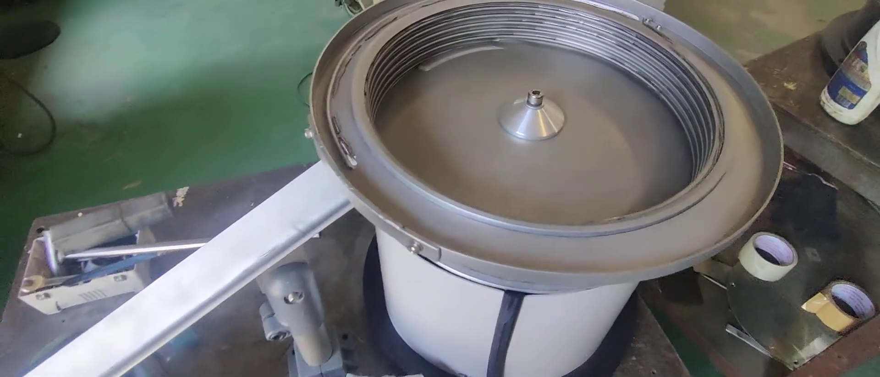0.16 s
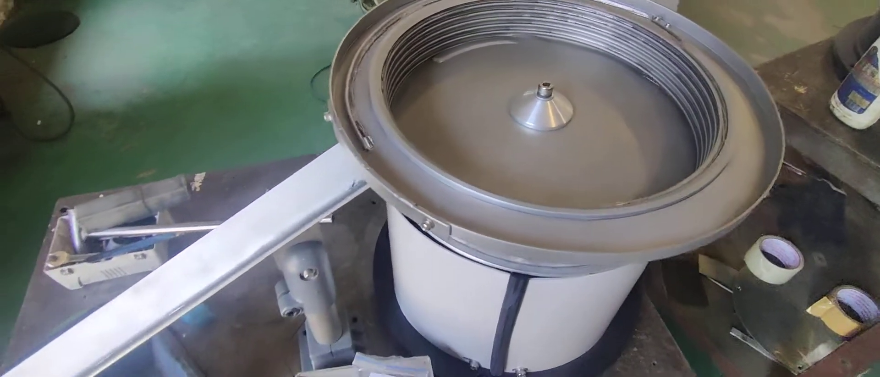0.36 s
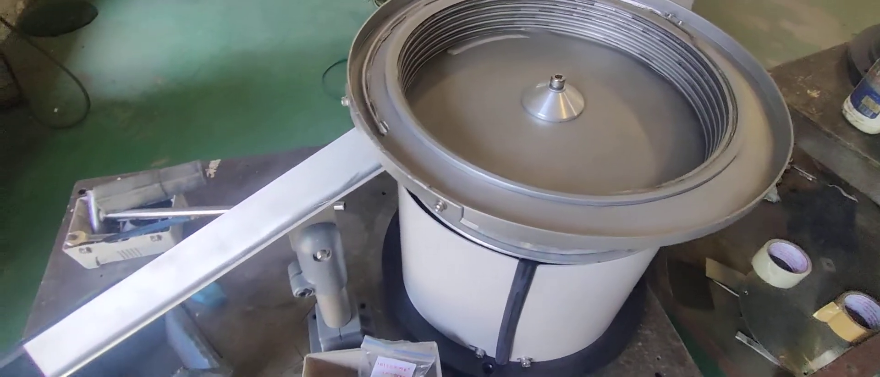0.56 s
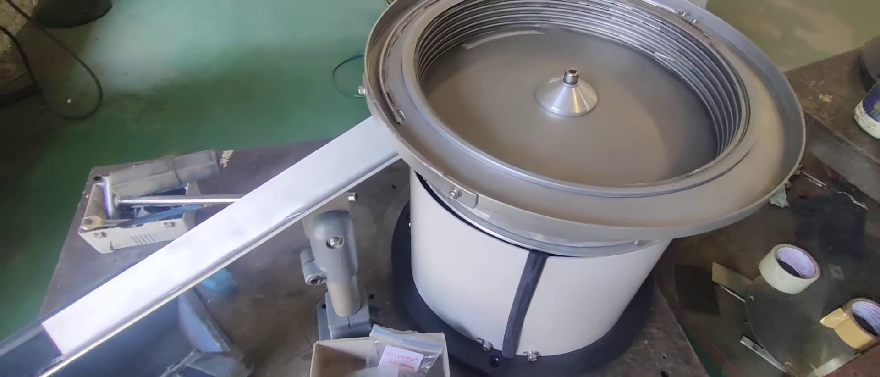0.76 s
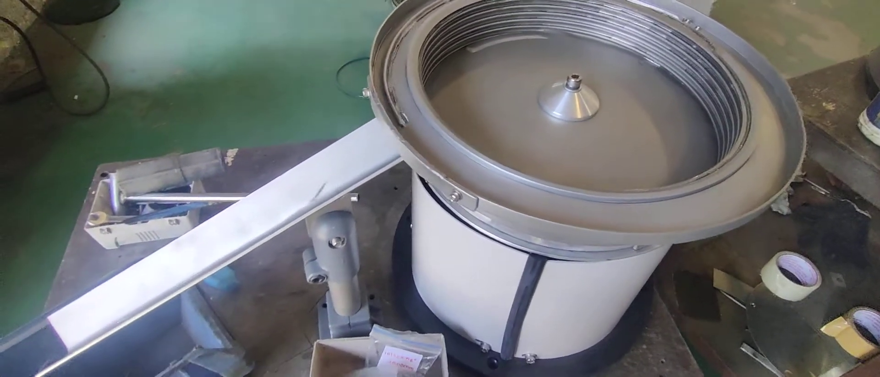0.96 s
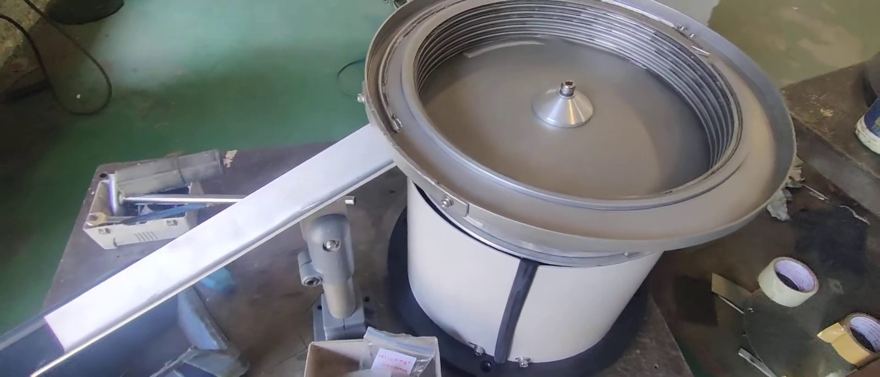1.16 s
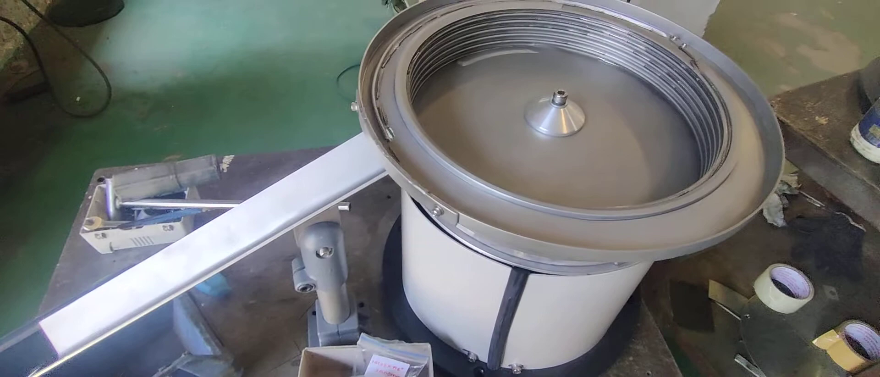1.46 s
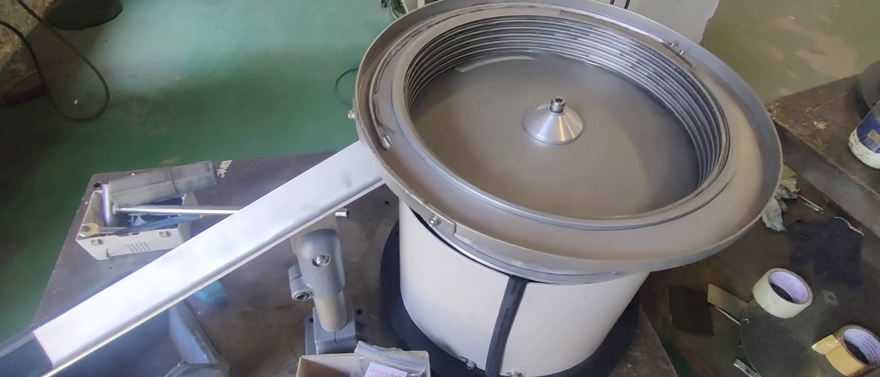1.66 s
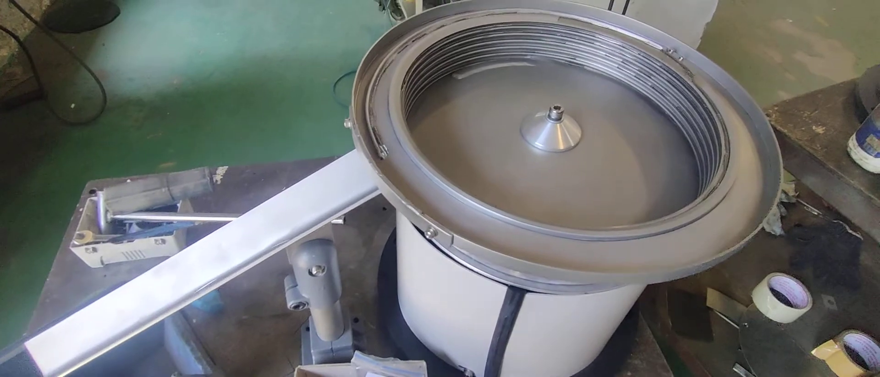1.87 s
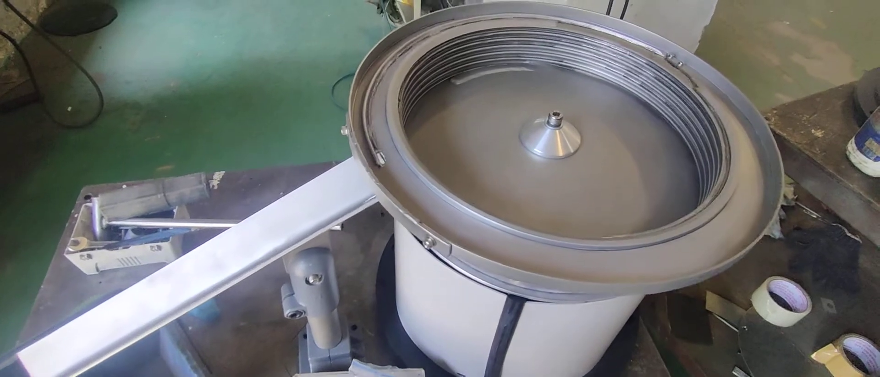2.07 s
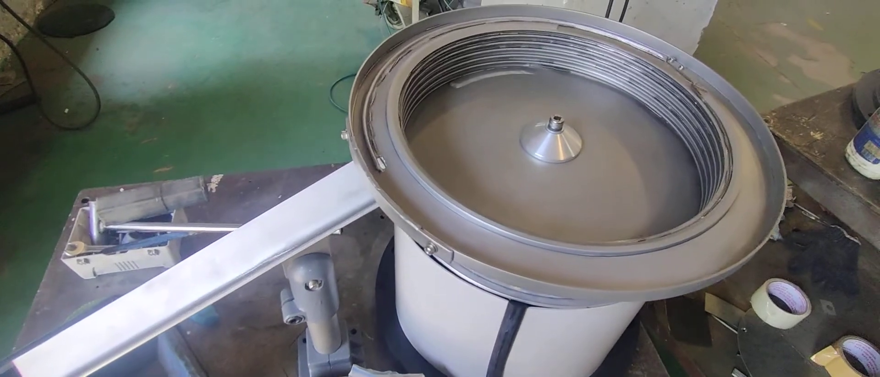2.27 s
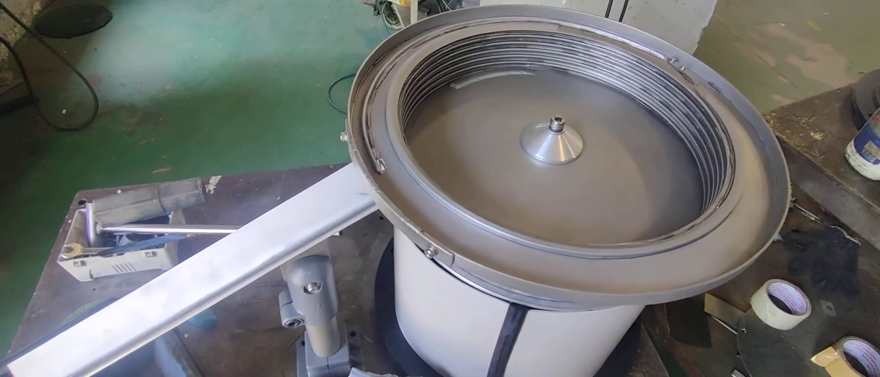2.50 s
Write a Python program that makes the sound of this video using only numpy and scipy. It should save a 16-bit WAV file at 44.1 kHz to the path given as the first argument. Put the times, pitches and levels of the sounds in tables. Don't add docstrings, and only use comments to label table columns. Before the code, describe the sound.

A vibrating steel bowl feeder hums steadily around 100 Hz throughout, with fine high chatter and short ringing rim pings stronger at right. Sharp, dry clacks of parts on the chute start at 0.13 s, recur near 0.24, 0.5, 0.73 and 1.0, crowd at 1.1-1.25, then thin out; hard ones hit at 2.19 and 2.32. Workshop rumble continues to 2.6 s, close, slightly compressed pickup.

```python
import sys
import numpy as np
from scipy import signal
from scipy.fft import rfft, irfft
from scipy.io import wavfile
from scipy.ndimage import uniform_filter1d

SR = 44100
rng = np.random.default_rng(int(sys.argv[2]) if len(sys.argv) > 2 else 0)


def ratio(d):
    e = np.asarray(d, float) / 20
    return 10 ** e


def to_wav(s):
    ch = np.atleast_2d(s).T
    pcm = np.round(np.clip(ch, -1, 1) * 32767)
    wavfile.write(sys.argv[1], SR, pcm.astype(np.int16))


N = 116424
LEFT_THEN_RIGHT = np.array([[1], [-1]])


def curve(table, at, log=False):
    x, y = np.array(table, float).T
    return np.interp(np.log(at), np.log(x), y) if log else np.interp(at, x, y)


def level(x, db):
    return x * ratio(db) / np.sqrt(np.mean(x ** 2))


def band(x, hz, width):
    edges = np.clip([hz - width / 2, hz + width / 2], 5, .45 * SR)
    return signal.sosfilt(signal.butter(N=1, Wn=edges, btype="band", fs=SR, output="sos"), x)


def ring(x, hz, t60):
    pole = np.exp(2j * np.pi * hz / SR - np.log(1000) / (t60 * SR))
    return signal.lfilter([1], [1, -pole], x).imag


def walk(rate):
    k = int(SR / rate)
    held = np.repeat(rng.standard_normal(N // k + 1), k)
    return 0.92 * uniform_filter1d(uniform_filter1d(held, k), k)[:N]


def place(x, pan_db, left_shift):
    return np.array([np.roll(x, left_shift) * ratio(pan_db / 2), x * ratio(-pan_db / 2)])


def below_top(x):
    top_hz = 15760
    return irfft(rfft(x) * (np.fft.rfftfreq(x.shape[-1], 1 / SR) < top_hz), x.shape[-1])


# multiple of the drive, left level in dB, right level in dB.
HUM_LINES = [(1, -13.5, -13.5), (2, -34.5, -33), (3, -28, -32), (4, -58, -43), (5, -46.5, -39.5),
             (6, -41.5, -41.5), (7, -52, -41.5), (8, -39, -41.5), (9, -32, -33.5), (10, -62, -36.5),
             (11, -45, -40), (12, -45, -49.5), (14, -58, -42.5)]
# time in seconds, gain in dB.
NINTH_SWELL = [(0, -5), (.55, -2.5), (.7, 0), (1.6, 1), (1.85, 2.5), (2.15, -0.5), (2.64, 0.5)]
DRIVE_HZ = 100.047
LAG_RAD, WOBBLE_DB = .6, 0.84


def hum(t):
    out = 0
    for k, left_db, right_db in HUM_LINES:
        lag = LAG_RAD * (k - 1) ** 2
        jitter = .012 * (k - 1) * walk(4)
        line = np.cos(2 * np.pi * k * DRIVE_HZ * t - lag + jitter)
        line_db = np.array([[left_db], [right_db]]) + WOBBLE_DB * np.sqrt(k) * walk(16) / 2
        if k == 9:
            line_db = line_db + curve(NINTH_SWELL, t)
        out = out + line * ratio(line_db)
    return out


# start in seconds, level in dB, pitch in Hz,
# left minus right in dB, brightness in dB.
CLACKS = [(.1343, -17, 7000, -8, -4), (.1390, -7, 6200, -4, 6), (.1427, -19, 6900, 0, 0),
          (.1470, -22, 4500, 0, -3), (0.2426, -5, 7000, -2, -3), (.2456, -19, 6800, -2, -4),
          (.2543, -22, 5200, 0, -4), (.4947, -4.5, 6060, 0, 2), (0.505, -17, 7500, -10, -3),
          (0.67, -14, 6500, -4, -5), (.7313, -7, 7500, -6, 5), (0.7323, -16, 6500, 0, 7),
          (.9923, -15.5, 7500, -10, 6), (0.9933, -7, 8400, -3, 6), (.9987, -10.5, 5900, -11, -4),
          (1.0861, -8, 6200, -9, 0), (1.087, -20, 3300, 2, 0), (1.1032, -21, 6600, 0, -4),
          (1.1393, -5, 5440, -4, -10), (1.1406, -15, 2900, 4, 0), (1.1842, -10, 3500, 3, 8),
          (1.1864, -19, 4300, -6, -2), (1.189, -17, 3450, -1, 4), (1.2288, -11, 5800, -1, -2),
          (1.232, -8, 8300, -11, -2), (1.2352, -9, 8400, -2, 3), (1.2370, -19, 7000, -6, 0),
          (1.4594, -16, 6200, -5, -3), (1.4655, -17.5, 5300, -5, -3), (1.4697, -16, 5500, -4, -1),
          (1.4768, -16.5, 7000, -5, -3), (1.662, -13, 7200, -4, -3), (1.7580, -17, 4800, -9, -3),
          (2.1582, -18, 4400, 1, -3), (2.1926, -4.5, 7000, 0, 7), (2.229, -14, 6200, 2, -2),
          (2.251, -11, 3200, -6, -2), (2.3024, -20, 4350, -2, -3), (2.3223, -6, 7000, -5, -4),
          (2.3236, -13.5, 2600, 2, 0)]
# frequency in Hz, gain in dB.
LEFT_PORT = [(1000, -22), (2700, -9), (4200, -6), (5800, 3), (7200, -6.5), (9000, -8), (11500, -10),
             (16000, -11)]
# frequency in Hz, gain in dB.
RIGHT_PORT = [(1000, -29), (2700, -13), (4500, -1), (5800, -2), (7500, 1), (9300, -1), (10800, -16),
              (15000, -29)]
RATTLE_DB, RATTLE_T60_S = -15, .009
TAIL_DB, TAIL_T60_S = -31, .045
PITCH_DB, PITCH_WIDTH_HZ, BRIGHT_FROM_HZ = 7, 600, 10000
DULL_DB, DULL_UNDER_HZ = 16, 5200
SHARP_DB, SHARP_TOP_HZ = -9, 16700
CHUTE_LEFT_SHIFT = -15


def clack_tint_db(f, hz, bright_db):
    pitch_db = PITCH_DB * np.exp(-((f - hz) / PITCH_WIDTH_HZ) ** 2)
    octaves_low = max(np.log2(DULL_UNDER_HZ / hz), 0)
    dull_db = DULL_DB * octaves_low * np.log2(np.maximum(f / hz, 1))
    return pitch_db + bright_db * (f > BRIGHT_FROM_HZ) - dull_db - 60 * (f > SHARP_TOP_HZ)


def clacks():
    n, lead = SR // 8, 200
    out = np.zeros((2, N + SR))
    u = (np.arange(n) - lead) / SR
    f = np.fft.rfftfreq(n, 1 / SR) + 1
    click = u == 0
    rattle_fade = ratio(RATTLE_DB - 60 * abs(u) / RATTLE_T60_S) * (u > 0)
    tail_fade = ratio(TAIL_DB - 60 * abs(u) / TAIL_T60_S) * (u > 0)
    ports_db = np.array([curve(LEFT_PORT, f, True), curve(RIGHT_PORT, f, True)])
    for s, db, hz, pan_db, bright_db in CLACKS:
        noise = rng.standard_normal((4, n))
        rattle = (noise[0] + 0.89 * noise[1:3]) * rattle_fade
        blow = click + rattle + noise[2:] * tail_fade
        hit = irfft(rfft(blow) * ratio(ports_db + clack_tint_db(f, hz, bright_db)), n)
        hit = hit / np.sqrt((hit ** 2).sum(axis=1, keepdims=True))
        hit = hit * ratio(db + 10.5 + LEFT_THEN_RIGHT * pan_db / 2)
        hit = np.array([np.roll(hit[0], CHUTE_LEFT_SHIFT), hit[1]])
        i = int(s * SR) - lead
        out[:, i:i + n] += hit if db > SHARP_DB else below_top(hit)
    return out[:, :N]


CHATTER_PER_S, CHATTER_DB, CHATTER_HZ = 1700, -40, 8400


def track_ticks(t):
    chance = CHATTER_PER_S / SR * (1 - .5 * np.sin(2 * np.pi * DRIVE_HZ * t))
    return (rng.random(N) < chance) * ratio(2.14 * rng.exponential(size=N) + 0.89 * walk(9.44))


def chatter(ticks):
    both = ticks * rng.standard_normal((2, N))
    for _ in range(2):
        both = band(both, CHATTER_HZ, 2300)
    return level(both, CHATTER_DB) * ratio(-6 * LEFT_THEN_RIGHT)


# start in seconds, level in dB, mode nearest the blow in Hz,
# that mode's extra level in dB.
PINGS = [(0.036, -36, 9360, 25.5), (0.073, -22.5, 8184, 0.5), (0.188, -27, 7982, -12),
         (0.388, -24, 8184, 1.5), (.45, -33, 8763, 13), (0.523, -32.5, 8184, 4), (0.596, -38, 8763, 4),
         (0.642, -29.5, 8184, 5.5), (.835, -47, 9360, 30), (.882, -29, 9862, 4), (.91, -45, 9162, 7),
         (1.03, -48, 8184, 14), (1.066, -26.5, 9862, 6), (1.587, -24.5, 9862, 7), (1.701, -32.5, 8763, 10),
         (1.74, -27, 6904, 5), (2.046, -27.5, 8184, -4), (2.108, -26.5, 9862, 11.5),
         (2.174, -26.5, 7982, 1), (2.325, -29, 7982, -8), (2.576, -27.5, 8184, -1)]
RIM_HZ = [11800, 6336, 6904, 7424, 7982, 8184, 8763, 9162, 9360, 9862, 10470, 13730, 13320, 14970]
RIM_PAN_DB = [3, -14, -15, -15, -17, -17, -17, -16, -16, -14, -10, 2, 2, 2]
# level in dB, 60 dB decay in seconds, level of the chatter in it in dB.
RIM_RING = [(-14, 0.1, -30), (-20.5, 0.38, -10), (-23, 0.56, -2), (-15.5, 0.19, -11), (-16, 0.26, -11),
            (-13, 0.22, 2), (-23.5, 0.28, -1.5), (-24, 0.46, -4.5), (-29, 0.13, -3.5), (-23, 0.27, -7),
            (-22.5, .2, -4), (-7, .1, -32), (-11, 0.13, -30), (-19, 0.24, -30)]
CHATTER_RING_DB, PING_SCATTER_DB = -49, 0.5
RIM_LEFT_SHIFT = -14
SIZZLE_HZ, SIZZLE_DB, SIZZLE_T60_S = 13700, -14, 0.11


def sizzle(at, blow_db):
    blows = np.zeros(N)
    blows[at] = ratio(blow_db + SIZZLE_DB)
    fade = signal.lfilter([1], [1, -ratio(-60 / (SIZZLE_T60_S * SR))], blows)
    puff = fade * rng.standard_normal((2, N))
    return band(band(puff, SIZZLE_HZ, 1500), SIZZLE_HZ, 1500) * ratio(12)


def rim(ticks):
    s, blow_db, near_hz, extra_db = np.array(PINGS).T
    at = (s * SR).astype(int)
    out = sizzle(at, blow_db)
    scatter_db = PING_SCATTER_DB * rng.standard_normal((len(PINGS), len(RIM_RING)))
    for k, (hz, pan_db, (db, t60, sung_db)) in enumerate(zip(RIM_HZ, RIM_PAN_DB, RIM_RING)):
        focus = np.exp(-((near_hz - hz) / 120) ** 2)
        hits = np.zeros(N)
        hits[at] = ratio(db + blow_db + extra_db * focus + scatter_db[:, k])
        pinged = ring(band(hits, hz, 3300), hz, t60) * ratio(-pan_db / 2)
        sung = ring(ticks * rng.standard_normal(N), hz, 0.3 * t60)
        sung = level(sung, CHATTER_RING_DB + sung_db)
        out = out + place(pinged + sung, pan_db, RIM_LEFT_SHIFT)
    return out


def bowl(t):
    ticks = track_ticks(t)
    return chatter(ticks) + rim(ticks)


# frequency in Hz, level in dB.
MOTORS = [(280, -40.5), (360, -45.5), (724, -43)]
SHAFT_HZ = [18, 24.6, 32, 64.2]
SHAFT_DB = [-25, -28, -33, -44]


def neighbours(t):
    out = 0
    for hz, db in list(MOTORS) + list(zip(SHAFT_HZ, SHAFT_DB)):
        turn = 2 * np.pi * (hz * t + rng.random()) + 0.21 * walk(6.6)
        out = out + np.cos(turn) * ratio(db + 0.5 * walk(5.6))
    return out


# frequency in Hz, density in dB per Hz.
SHOP_SPECTRUM = [(20, -23), (50, -7), (110, -10), (500, -12), (1300, -16.5), (6000, -24), (11500, -38),
                 (15500, -37)]
# centre in Hz, width in Hz, gain in dB.
HUMPS = [(66, 4.3, 6), (236, 11, 3.5), (523, 46, 3), (950, 24, 4.5), (4670, 320, 3)]
# frequency in Hz, left minus right in dB.
TILT = [(100, 0.5), (350, 1), (1400, -1), (4000, -5), (6500, -7), (8500, -6), (11500, 3.5), (16000, 2)]
# frequency in Hz, side minus mid in dB.
WIDTH = [(40, -46), (200, -18), (500, -7.5), (900, -1.5), (1400, 1.5), (16000, -1.5)]
SHOP_DB, FLICKER_DB, SWELL_DB = -25.5, -0.36, 2.2


def shop():
    f = np.fft.rfftfreq(N, 1 / SR) + 1
    shape_db = curve(SHOP_SPECTRUM, f, True)
    for hz, width, db in HUMPS:
        shape_db = shape_db + db * np.exp(-((f - hz) / width) ** 2)
    mid, side = rfft(rng.standard_normal((2, N)))
    pair = mid + LEFT_THEN_RIGHT * ratio(curve(WIDTH, f, True)) * side
    pair = pair * ratio(shape_db + LEFT_THEN_RIGHT * curve(TILT, f, True) / 2)
    swell_db = SWELL_DB * walk(3)
    third_octave = 3 * np.log2(f / 20)
    out = 0
    for k in range(30):
        share = np.clip(1 - abs(third_octave - k), 0, 1)
        out = out + irfft(pair * share, N) * ratio(swell_db + FLICKER_DB * walk(12.8))
    return level(out, SHOP_DB)


def scene():
    t = np.arange(N) / SR
    steady = hum(t) + bowl(t) + neighbours(t) + shop()
    return below_top(steady) + clacks()


def low_pass(x):
    return signal.sosfilt(signal.butter(12, 16770, fs=SR, output="sos"), x)


# time in seconds, gain in dB.
SLOW_GAIN = [(0, 1), (.12, 1.2), (.3, -1.1), (.4, 1.8), (.46, 1), (.54, 0), (.575, 0), (.62, 2), (.68, 2.3),
             (.76, -1), (.86, 1), (.95, 1), (1.1, 1), (1.18, -1.5), (1.25, -0.4), (1.8, 1.44), (2.4, 0.5),
             (2.64, 1.3)]
# start in seconds, left gain in dB, right gain in dB.
DUCKS = [
    (.139, -5, 0),
    (0.242, 0.5, -4),
    (0.497, -2, -3),
    (0.731, 2, -0.5),
    (0.993, -4, -1.5),
    (1.14, 1, -1.5),
    (2.192, 0, -6.5),
]
ATTACK_S, HOLD_S, RECOVER_S = 0.00067, 0.078, 0.021


def record(dry):
    t = np.arange(N) / SR
    gain_db = curve(SLOW_GAIN, t) + np.zeros((2, 1))
    for s, left_db, right_db in DUCKS:
        attack = np.clip((t - s) / ATTACK_S, 0, 1)
        recovery = np.clip((s + HOLD_S + RECOVER_S - t) / RECOVER_S, 0, 1)
        gain_db = gain_db + attack * recovery * np.array([[left_db], [right_db]])
    mix = np.clip(dry * ratio(gain_db), -.9, .9)
    return low_pass(mix)


dry = scene()
out = record(dry)
to_wav(out)
```